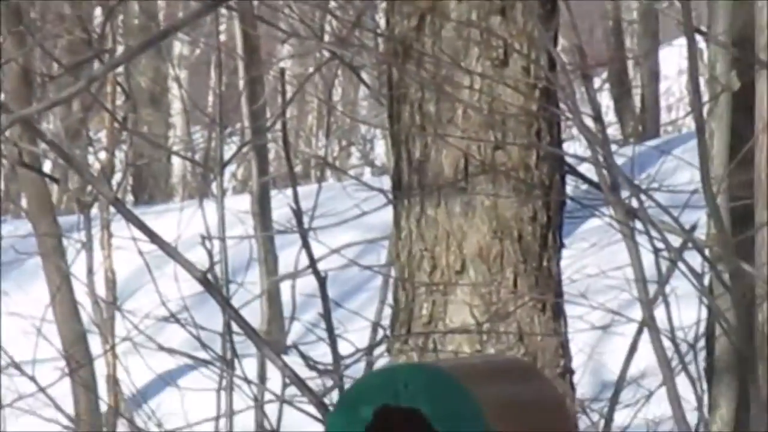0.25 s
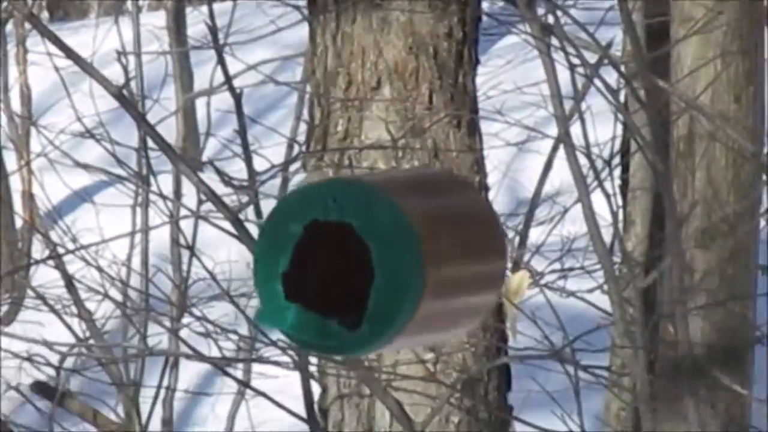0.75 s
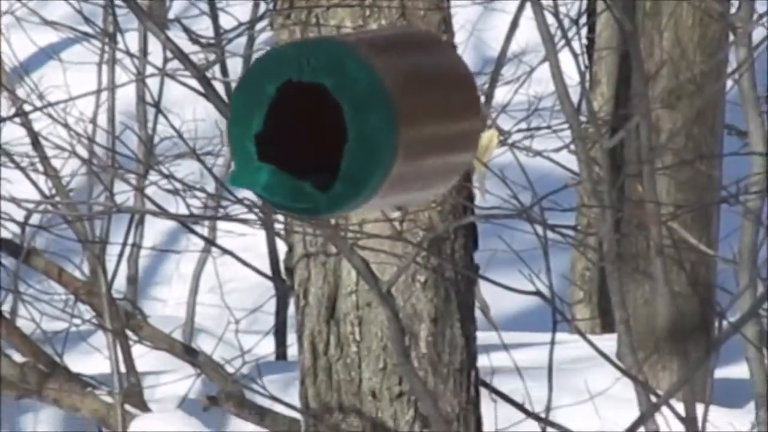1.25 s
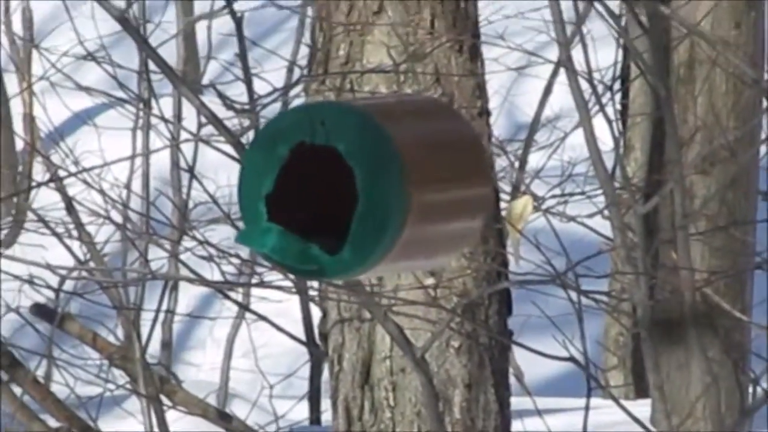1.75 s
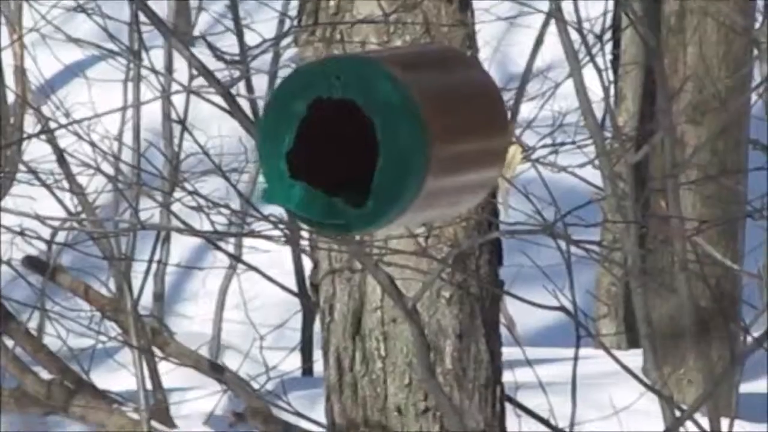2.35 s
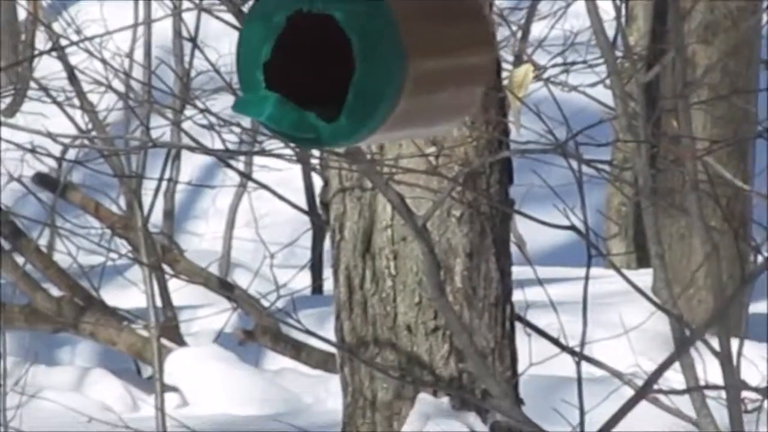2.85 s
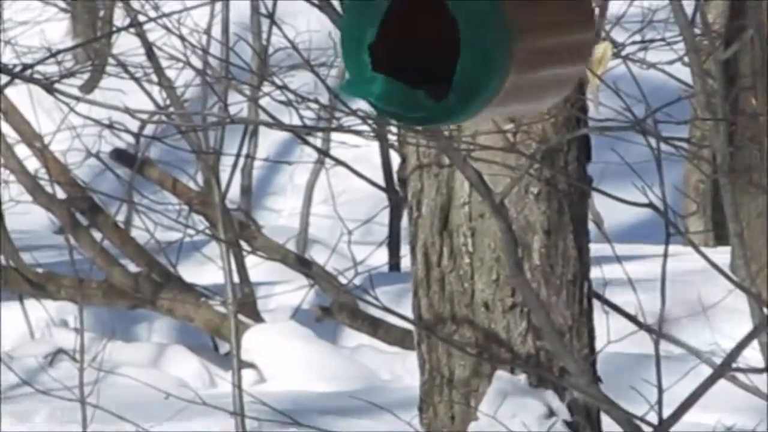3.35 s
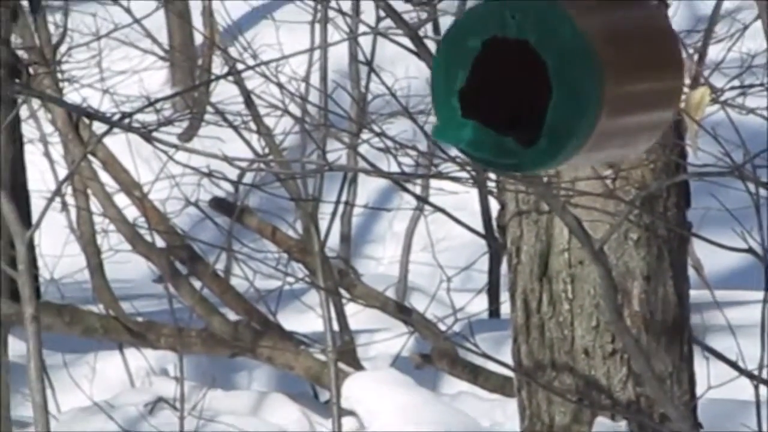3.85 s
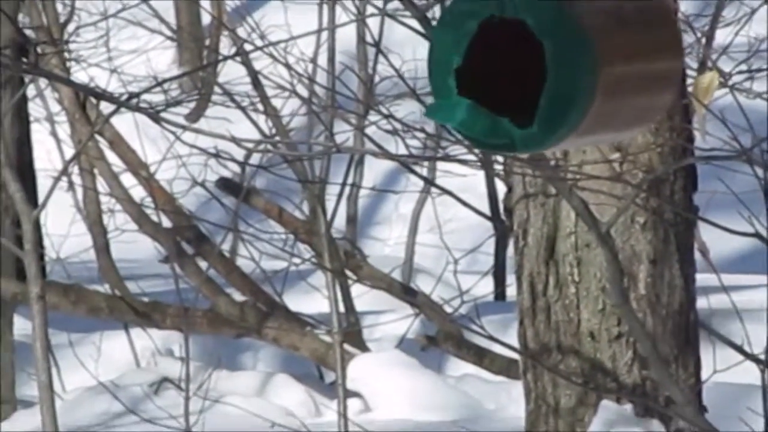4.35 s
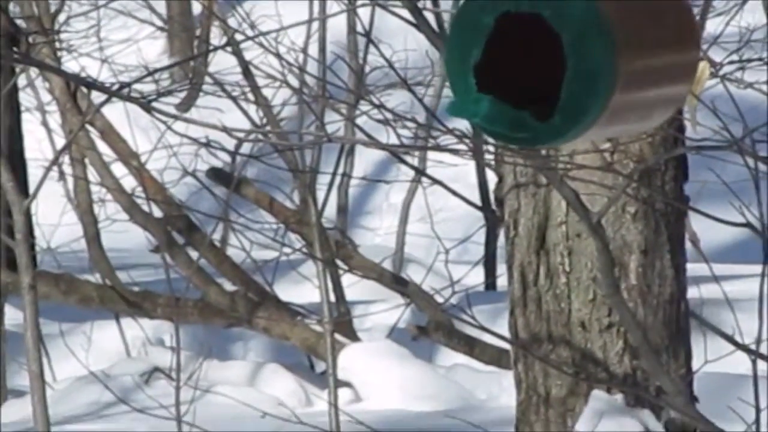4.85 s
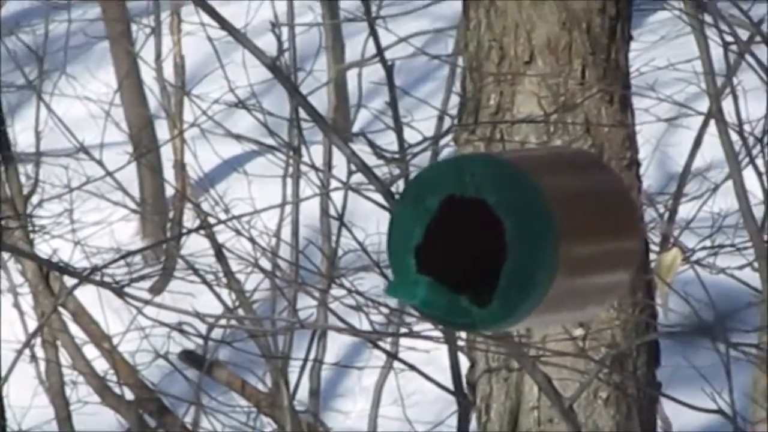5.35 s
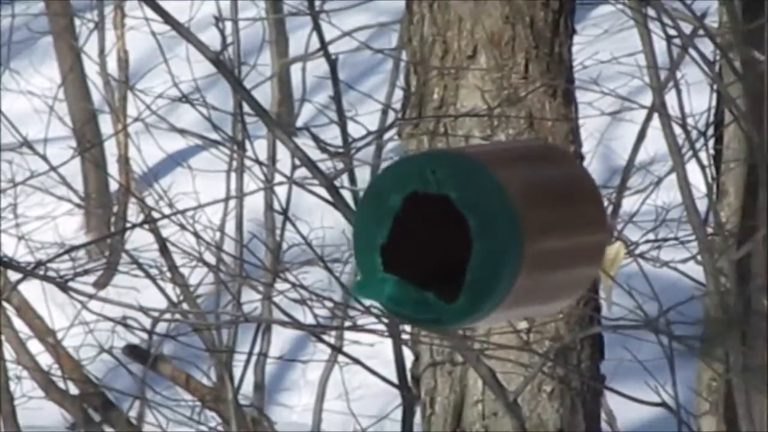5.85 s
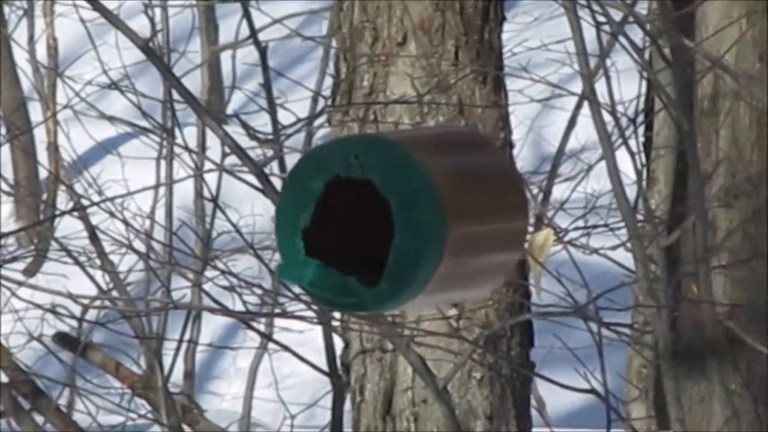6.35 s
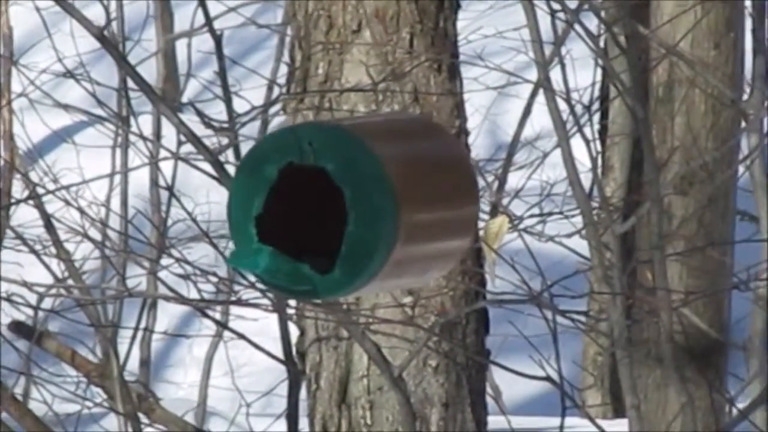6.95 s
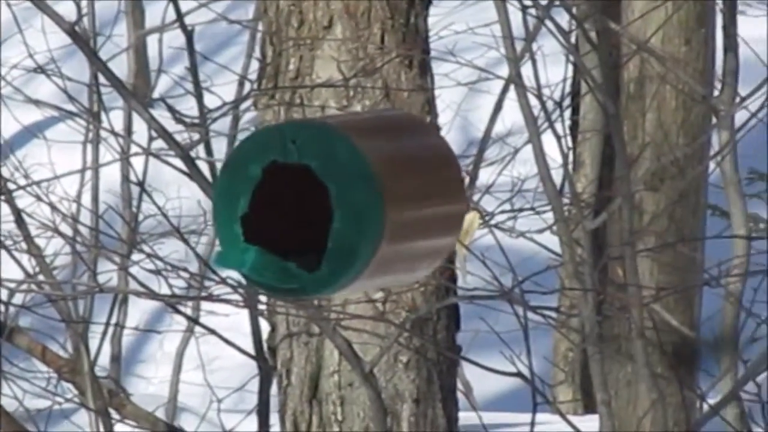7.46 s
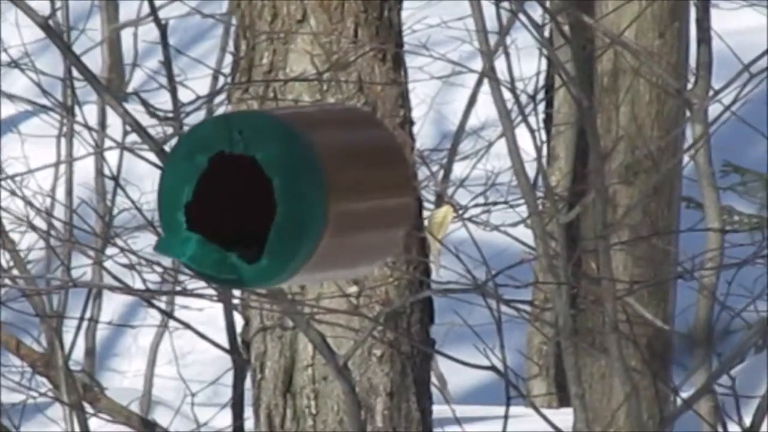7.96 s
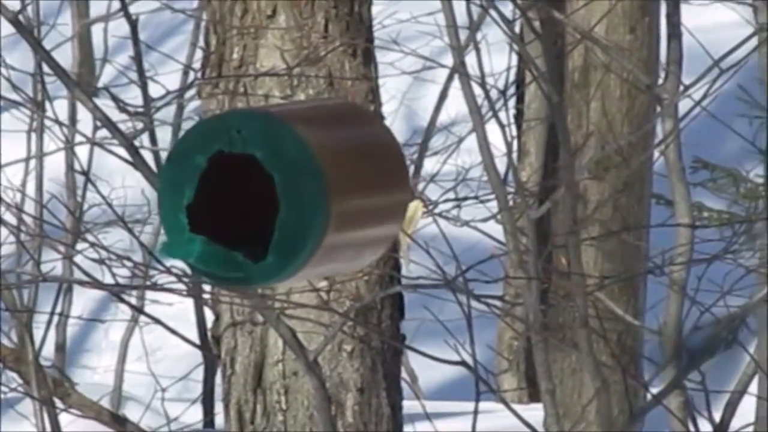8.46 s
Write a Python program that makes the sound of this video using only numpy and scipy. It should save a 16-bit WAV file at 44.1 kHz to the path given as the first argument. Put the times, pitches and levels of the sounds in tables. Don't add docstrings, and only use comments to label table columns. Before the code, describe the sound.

A chickadee is already buzzing at 0 s: five hoarse, noisy dees, each about a quarter second, run until 1.25 s, the last one quieter. A faint far buzz follows at 1.4, tiny dry ticks at 1.6-2.7, a weak high peep at 2.1 and a lone rough dee at 2.2. At 2.95 one very thin, piercing chip rises briefly and falls. Four more rasping dees from 3.1 to 4.0 grow louder and tighter. Then mostly background, with faint whistles at 4.2-5.3, including a steep chip near 5.0. From 5.74 a clearer, lower-buzzing, louder bird gives seven nasal dees about 0.3 s apart, then another at 8.0; a distant buzz answers at 8.35. Trunks return short echoes. Low handling thumps cluster near 0.7, 3.3 and 3.8 s; soft hollow taps recur from 4.6. Wind rumble, distant traffic and steady hiss continue throughout, gusting at the end.

```python
import sys
import numpy as np
from scipy import signal
from scipy.fft import rfft, irfft
from scipy.io import wavfile
from scipy.ndimage import uniform_filter1d, minimum_filter1d

SR = 44100
rng = np.random.default_rng(int(sys.argv[2]) if len(sys.argv) > 2 else 0)


def decibels_to_gain(level_db):
    exponent = np.asarray(level_db, float) / 20
    return 10 ** exponent


def wrap_up_sound(samples):
    columns = np.atleast_2d(samples).T
    tamed = np.clip(columns, -1, 1)
    steps = np.round(tamed * 32767).astype(np.int16)
    wavfile.write(sys.argv[1], SR, steps)


N = 383669


def colour(table, hz):
    f, db = np.transpose(table)
    return decibels_to_gain(np.interp(np.log(np.maximum(hz, 1)), np.log(f), db))


def over_time(table):
    return np.interp(np.arange(N) / SR, *np.transpose(table))


def slow(shape, hz):
    k = max(int(SR / hz), 1)
    noise = rng.standard_normal(shape)
    return uniform_filter1d(uniform_filter1d(noise, k), k) * np.sqrt(1.5 * k)


def add(out, at, x):
    x, at = x[max(-at, 0):], max(at, 0)
    out[at:at + len(x)] += x[:N - at]


def ring(hz, t60):
    t = np.arange(int(t60 * SR)) / SR
    return np.sin(2 * np.pi * hz * t) * decibels_to_gain(-60 * t / t60)


def air():
    # (frequency [Hz], level per Hz [dB])
    air_colour = [(12, -38), (20, -8.5), (43, -3.5), (105, -8), (160, -2.5), (194, -6.5), (217, -3),
                  (294, -7), (328, -7), (357, -6), (994, -13), (1550, -24), (4820, -35.5), (11400, -41.5),
                  (12500, -44.5), (15000, -47)]
    # (time [s], gust level [dB])
    gusts = [(0.0, -61.5), (0.63, -58), (0.94, -64), (1.77, -66), (3.25, -66.5), (3.4, -59), (5.47, -67.5),
             (7.15, -60), (8.4, -63), (8.7, -53)]
    # (time [s], level [dB])
    traffic_db = [(0, 2.5), (.5, 0), (1.8, 0), (2.35, 2), (3.0, -1), (7.0, 0), (7.4, 1.5), (8.7, 2)]
    hz = np.fft.rfftfreq(N, 1 / SR)
    gain = colour(air_colour, hz) / (1 + (hz / 15200) ** 60)
    mid, side = (rfft(rng.standard_normal(N)) * gain for _ in range(2))
    bass = 1 / (1 + (hz / 140) ** 4)
    treble = 1 / (1 + (1400 / np.maximum(hz, 1)) ** 4)
    rumble = irfft(mid * bass, N) * decibels_to_gain(over_time(gusts) + 63.5 + 3 * slow(N, 9))
    traffic = irfft(mid * (1 - bass - treble), N) * decibels_to_gain(over_time(traffic_db) + 1.3 * slow(N, 8.4))
    hiss = irfft(mid * treble, N)
    x = rumble + traffic + hiss
    spread = irfft(side * np.clip(hz / 9000, .08, .6), N)
    whine = decibels_to_gain(-89) * np.sin(2 * np.pi * 11795 * np.arange(N) / SR)
    return (x + spread * np.array([[1], [-1]])) * decibels_to_gain(-47.5) / np.std(x) + whine


def handling():
    # (peak time [s], peak level [dB], swing [Hz])
    thumps = [(0.421, -35, 92), (0.612, -42, 99), (0.65, -25, 75), (0.71, -30.5, 92), (0.727, -33, 84),
              (0.75, -30, 53), (0.769, -30.5, 102), (1.543, -33.5, 104), (3.268, -30, 89), (3.293, -30, 71),
              (3.317, -27.5, 83), (3.338, -33, 67), (3.454, -36, 87.5), (3.489, -34, 53),
              (3.747, -23.5, 102.5), (3.846, -27.5, 81), (4.117, -36, 73.5), (4.422, -34, 74),
              (5.378, -35, 117.5), (6.551, -37, 130), (6.568, -35, 140), (6.932, -40, 141),
              (6.968, -33, 115), (7.95, -36, 72), (8.144, -34, 101), (8.191, -33.5, 88)]
    # (time [s], peak level [dB], upper ring relative level [dB])
    taps = [(4.624, -52.5, 5.5), (5.04, -45, -11), (5.209, -47.5, -3.5), (5.339, -46, -17),
            (5.505, -48, -19.5), (5.649, -52, -13), (5.778, -47, -15), (5.919, -45.5, -21),
            (6.078, -46, -25), (6.222, -46.5, -5), (6.358, -50, -18.5), (6.524, -43.5, -16),
            (6.659, -45, -15), (6.916, -42, -16.5), (7.125, -64, -9), (7.266, -57, -9.5),
            (7.453, -49.5, 0.5), (7.544, -50, -14), (7.761, -43.5, -18), (7.889, -48, 0.5), (8.05, -43, -4),
            (8.179, -47, -18), (8.311, -45.5, -20), (8.458, -54, -4), (8.632, -49, -13)]
    # (frequency [Hz], t60 [s])
    shell = [
        (162, 0.27),
        (340, 0.28),
    ]
    out = np.zeros(N)
    for s, db, hz in thumps:
        cycles = np.arange(-1500, 1500) / SR * hz
        swing = np.cos(2 * np.pi * cycles) * np.exp(-(cycles / 0.46) ** 2)
        add(out, int(s * SR) - len(cycles) // 2, decibels_to_gain(db) * swing)
    for s, db, upper_db in taps:
        for (hz, t60), gain_db in zip(shell, (db, db + upper_db)):
            add(out, int(s * SR), decibels_to_gain(gain_db + 5.5) * ring(hz, t60))
    return out


def woods(x, echo_db, blur_db, t60, alike):
    # (delay [s], level [dB], left minus right [dB])
    trunks = [
        (0.0163, -9.5, 0.7),
        (0.034, -11, 1),
        (0.048, -14.5, 2),
    ]
    t = np.arange(int(.6 * SR)) / SR
    same, *own = rng.standard_normal((3, len(t)))
    swell = (1 - np.exp(-t / 0.0067)) * decibels_to_gain(-60 * t / t60)
    swell = swell / np.sqrt(np.sum(swell ** 2))
    answer = decibels_to_gain(blur_db) * swell * (np.sqrt(alike) * same + np.sqrt(1 - alike) * np.array(own))
    answer[:, 0] = 1
    for s, db, pan_db in trunks:
        answer[:, int(s * SR)] += decibels_to_gain(db + echo_db + np.array([pan_db, -pan_db]) / 2)
    return signal.fftconvolve(x[None], answer)[:, :N]


def ticks():
    # (time [s], peak level [dB], ring [Hz])
    twigs = [
        (1.5874, -51.5, 5310),
        (1.7075, -48.5, 6750),
        (2.4694, -50, 5500),
        (2.5706, -45, 4460),
        (2.7135, -48, 6630),
        (4.7003, -55.5, 6950),
        (8.6891, -49, 3985),
    ]
    out = np.zeros(N)
    for s, db, hz in twigs:
        tone = ring(hz, t60=0.0061)
        click = .5 * np.abs(tone) * rng.standard_normal(len(tone))
        add(out, int(s * SR), decibels_to_gain(db + 3.0) * (tone + click))
    return out


def read(note):
    s, *columns = np.transpose(note)
    t = np.arange(int(s[0] * SR), int(s[-1] * SR)) / SR
    edge = np.clip(np.minimum((t - s[0]) / 0.014, (s[-1] - t) / 0.0059), 0, 1)
    return int(s[0] * SR), edge, [np.interp(t, s, c) for c in columns]


def whistles(notes):
    out = np.zeros(N)
    for note in notes:
        at, edge, (hz, db) = read(note)
        hz = uniform_filter1d(hz, size=200)
        add(out, at, edge * decibels_to_gain(db) * np.sqrt(2) * np.sin(2 * np.pi * np.cumsum(hz) / SR))
    return out


def dees(notes, throat, beak_rest_hz, pipe_rest_hz, wobble, smear_hz, patchy_db, follow, locked):
    out = np.zeros(N)
    for note in notes:
        at, edge, (rate_hz, db, beak_hz, low_db, rough, pipe_hz) = read(note)
        rate_hz = uniform_filter1d(rate_hz, size=1500)
        pipe_hz = pipe_hz * (rate_hz / rate_hz.max()) ** follow
        anchor_hz = 9 * rate_hz if locked else pipe_hz
        k = np.arange(-6, int(11000 / rate_hz.max()))[:, None]
        hz = np.maximum(anchor_hz + k * rate_hz, 300)
        phase = 2 * np.pi * np.cumsum(hz * (1 + wobble * slow(len(db), 90)), axis=1) / SR

        upper = np.clip((hz - 4400) / 600 + .5, 0, 1)
        lower = 1 - upper
        beak_share = upper * np.clip((9500 - hz) / 2000, 0, 1)
        shift = (beak_rest_hz / beak_hz) ** beak_share * (pipe_rest_hz / pipe_hz) ** lower
        gain = colour(throat, hz * shift) * decibels_to_gain(patchy_db * slow(hz.shape, 25))
        gain = gain / (1 + (hz / 11300) ** 24)
        upper_rms, lower_rms = (np.sqrt(np.sum((gain * share) ** 2, axis=0) / 2) for share in (upper, lower))
        gain = gain * (upper / upper_rms + lower * decibels_to_gain(low_db) / lower_rms)

        r = np.clip(rough * (hz / 6000) ** .3, 0, 1)
        smear = (slow(hz.shape, smear_hz) + 1j * slow(hz.shape, smear_hz)) / np.sqrt(2)
        spin = np.exp(1j * (phase + 0.77 * rng.standard_normal(k.shape)))
        partials = gain * (spin * (np.sqrt(1 - r) + np.sqrt(r) * smear)).real
        add(out, at, edge * decibels_to_gain(db) * np.sum(partials, axis=0))
    return out


def sing(rows, rough, low_db, pipe_hz, attack_s, release_s, crest, start_db, swell_db, sag_db, end_db, slack, bend,
         beak_hz_per_s=0, pipe_hz_per_s=0, neck=0, clearing=0):
    notes = []
    for s, length, db, rate_hz, beak_hz in rows:
        bends = np.array([0, attack_s, crest * length, length - release_s, length])
        t = np.union1d(bends, np.linspace(0, length, num=7))
        level_db = db + np.interp(t, bends, [start_db, -swell_db, 0, -sag_db, end_db])
        rate = rate_hz * (1 - slack * (1 - t / length) ** bend)
        beak = beak_hz + beak_hz_per_s * t
        pipe = pipe_hz + pipe_hz_per_s * t + neck * (beak_hz - rows[0][-1])
        roughness = rough * (1 - clearing * np.clip(4 * t / length - 1.6, 0, 1))
        notes.append(np.transpose([s + t, rate, level_db, beak, low_db + 0 * t, roughness, pipe]))
    return notes


def peeps():
    # (start [s], length [s], first pitch [Hz], last pitch [Hz], level [dB])
    far_peeps = [
        (2.123, 0.086, 7076, 7035, -62),
        (4.19, 0.087, 6450, 6560, -72),
        (4.365, 0.072, 5080, 4880, -67.5),
        (4.983, 0.026, 9020, 6670, -46.5),
        (5.119, 0.06, 8350, 6900, -52),
        (5.191, 0.07125, 2800, 2640, -67),
    ]
    notes = []
    for s, length, hz0, hz1, db in far_peeps:
        middle = (s + length / 2, (hz0 + hz1) / 2, db)
        notes.append([(s, hz0, db - 1), middle, (s + length, hz1, db - 1)])
    return whistles(notes)


def far_birds():
    # (frequency [Hz], level [dB])
    first_throat = [(1470, -51.5), (2500, -24), (2960, -15), (3570, -12.5), (4730, -10), (4940, -4),
                    (5860, -2), (8000, -39.5), (10400, -61), (17600, -120)]
    second_throat = [(1470, -48), (2500, -8.5), (2790, -21), (4370, 2.5), (5590, -21), (6650, -3),
                     (7410, -44), (9420, -18), (10500, -48.5), (13600, -70), (22000, -120)]
    # (start [s], length [s], crest level [dB], final buzz rate [Hz], starting beak resonance [Hz])
    first_note = [(1.405, 0.13, -54.5, 433, 5600)]
    second_note = [(8.343, .097, -46.5, 444, 5000)]
    shape = dict(rough=0.915, low_db=-7, pipe_hz=2980, release_s=0.048, crest=0.2, swell_db=-3.5, sag_db=15,
                 end_db=-17, slack=.045, bend=2.9)
    first = sing(first_note, attack_s=0.024, start_db=-13, **shape)
    second = sing(second_note, attack_s=0.00493, start_db=3.0, **shape)
    return (dees(first, first_throat, beak_rest_hz=5600, pipe_rest_hz=3018.5, wobble=0.0065, smear_hz=496.07,
                 patchy_db=2.5, follow=0, locked=True)
            + dees(second, second_throat, beak_rest_hz=5000, pipe_rest_hz=3000, wobble=0.0086, smear_hz=508.64,
                   patchy_db=1.5, follow=0, locked=True)
            + peeps())


def chip():
    # (time [s], pitch [Hz], level [dB])
    glide = [
        (2.952, 8910, -31.5),
        (2.957, 8290, -24.5),
        (2.968, 8500, -16),
        (2.98, 8610, -16.5),
        (2.99, 8779, -13.5),
        (3.008, 8680, -13),
        (3.024, 8355, -13),
        (3.037, 7879, -18.5),
        (3.044, 5900, -30),
    ]
    return whistles([glide])


def hoarse_bird():
    # (frequency [Hz], level [dB])
    early_throat = [(740, -68), (1250, -41), (1780, -15.5), (1930, -24.5), (2120, -24), (2350, -24),
                    (2750, -5), (3880, -18), (4340, -14.5), (4850, -14), (6060, 0), (6970, -1), (9460, -19),
                    (10700, -41), (11500, -59.5), (15000, -88.5), (22000, -120)]
    later_throat = [(740, -65.5), (1250, -38.5), (1590, -19), (2140, -24), (2630, -10), (2860, -15),
                    (3080, -14), (3340, -14.5), (4800, -17.5), (5520, -5.5), (6410, 1.5), (7100, -3.5),
                    (8080, -15.5), (9380, -12), (11500, -74), (15000, -87.5), (22000, -120)]
    lone_throat = [(740, -69), (1250, -36), (1770, -11.5), (1990, -29.5), (2180, -11), (3440, -10.5),
                   (4240, -17.5), (5850, -0.5), (6610, -14.5), (9840, -37.5), (10800, -52.5), (12000, -100),
                   (15600, -130), (22000, -120)]
    # (start [s], length [s], crest level [dB], final buzz rate [Hz], starting beak resonance [Hz])
    early_notes = [
        (-.15, .225, -19.5, 435, 6283),
        (.075, 0.22, -19.5, 453.6, 6244),
        (.318, 0.21, -17, 479, 6355),
        (.558, .342, -19.5, 458.4, 6500),
        (.985, .27, -23, 454, 6686),
    ]
    later_notes = [
        (3.088, .217, -24.5, 391.5, 6402),
        (3.315, 0.22, -22, 406.7, 6357),
        (3.535, .245, -19.5, 440, 6290),
        (3.782, 0.21, -17.5, 468, 6736),
    ]
    lone_note = [(2.175, .195, -23, 456.6, 5600)]
    shape = dict(rough=1.0, attack_s=.035, release_s=.037, crest=0.79, swell_db=1.5, sag_db=0.6, bend=.7)
    early = sing(early_notes, low_db=-10.5, pipe_hz=2600, slack=.07, beak_hz_per_s=980, pipe_hz_per_s=600,
                 neck=.45, start_db=-6, end_db=-11, **shape)
    later = sing(later_notes, low_db=-13.5, pipe_hz=2401, slack=.05, beak_hz_per_s=500, pipe_hz_per_s=1300,
                 neck=.3, start_db=-5.5, end_db=-6.5, **shape)
    lone = sing(lone_note, rough=1.0, clearing=.7, low_db=-9, pipe_hz=3010, attack_s=0.033, release_s=.03,
                crest=0.35, start_db=-6, swell_db=2.5, sag_db=3.0, end_db=-2, slack=.08, bend=1.2,
                beak_hz_per_s=810)
    return (dees(early, early_throat, beak_rest_hz=6500, pipe_rest_hz=2800, wobble=.006, smear_hz=320,
                 patchy_db=3.0, follow=0, locked=False)
            + dees(later, later_throat, beak_rest_hz=6450, pipe_rest_hz=2590, wobble=0.0069, smear_hz=332,
                   patchy_db=2.5, follow=0, locked=False)
            + dees(lone, lone_throat, beak_rest_hz=5700, pipe_rest_hz=2884.1, wobble=0.0065, smear_hz=400,
                   patchy_db=0.5, follow=0, locked=True))


def clear_bird():
    # (frequency [Hz], level [dB])
    run_throat = [(740, -71.5), (1250, -62), (1580, -29.5), (2000, -39.5), (2130, -63), (2640, -23),
                  (3150, -13.5), (3670, -14.5), (4240, -26), (5100, -11), (5760, 3.5), (6500, -8.5),
                  (7070, -16.5), (8160, -35), (9620, -33), (11700, -45.5), (14500, -63)]
    lone_throat = [(740, -75), (1250, -51), (1500, -27), (1900, -31), (2290, -51.5), (2990, -15.5),
                   (4240, -15.5), (4500, -7), (6000, 2.5), (7220, -30), (10100, -39.5), (12700, -38),
                   (14500, -63)]
    # (start [s], length [s], crest level [dB], final buzz rate [Hz], starting beak resonance [Hz])
    run_notes = [
        (5.74, .19, -12, 315, 5600),
        (6.02, 0.2, -12, 315.3, 5660),
        (6.31, .2, -12, 320.2, 5746),
        (6.648, 0.2, -11, 328.4, 5713),
        (6.93, .19, -11, 329, 5932),
        (7.245, 0.19, -10.5, 332, 5860),
        (7.565, 0.2, -11.5, 331.6, 5853),
    ]
    lone_note = [(7.995, .175, -12.5, 319, 6050)]
    shape = dict(attack_s=0.023, release_s=0.033, crest=0.66, start_db=-11, swell_db=4.5, sag_db=5.0, end_db=-10,
                 slack=.12, bend=2.2)
    run = sing(run_notes, rough=0.47, low_db=-14, pipe_hz=2996, beak_hz_per_s=700, pipe_hz_per_s=230, neck=0.25,
               **shape)
    lone = sing(lone_note, rough=.33, low_db=-12.0, pipe_hz=3020, beak_hz_per_s=-600, **shape)
    return (dees(run, run_throat, beak_rest_hz=5838, pipe_rest_hz=3040, wobble=0.0036, smear_hz=270,
                 patchy_db=3.5, follow=0.96, locked=True)
            + dees(lone, lone_throat, beak_rest_hz=5876, pipe_rest_hz=2980, wobble=0.0028, smear_hz=255,
                   patchy_db=3.0, follow=1.0, locked=True))


def scene():
    # (time [s], left minus right [dB])
    side_of = [
        (0.0, -0.5),
        (0.77, -1.0),
        (1.19, -4),
        (3.05, -4),
        (3.41, -0.5),
        (4.04, -2.5),
        (5.33, 0.5),
        (5.38, -2.5),
        (8.7, -2),
    ]
    far = woods(far_birds(), echo_db=4.0, blur_db=8.0, t60=0.244, alike=0.41)
    near = woods(ticks() + chip() + hoarse_bird() + clear_bird(), echo_db=-1.2, blur_db=-4.5, t60=0.17, alike=0.77)
    pan_db = over_time(side_of)
    birds = (decibels_to_gain(-1.0) * near + decibels_to_gain(-3.5) * far) * decibels_to_gain(np.array([pan_db, -pan_db]) / 2)
    return birds + handling() + air()


def band_limit(x):
    return signal.sosfilt(signal.butter(12, 15050, fs=SR, output="sos"), x)


def record(dry):
    # (frequency [Hz], level [dB])
    width = [(300, -5.5), (3800, -18), (4800, -12), (5800, 1), (9000, -5.5), (12000, -1)]
    hz = np.fft.rfftfreq(N, 1 / SR)
    mid, side = (dry[0] + dry[1]) / 2, (dry[0] - dry[1]) / 2
    side = irfft(rfft(side) * colour(width, hz), N)
    both = np.array([mid + side, mid - side])

    top = irfft(rfft(both) / (1 + (11000 / np.maximum(hz, 1)) ** 60), N)
    loudness = np.sqrt(uniform_filter1d(np.diff(mid, prepend=0) ** 2, size=1000) + 1e-12)
    both = both - top / (1 + (decibels_to_gain(-46) / loudness) ** 6)

    peak = np.abs(both).max(axis=0) + 1e-9
    room_left = minimum_filter1d(np.minimum(.92 / peak, 1), size=200)
    both = both * uniform_filter1d(room_left, size=200)
    return band_limit(both - 0.067 * both ** 3)


dry = scene()
out = record(dry)
wrap_up_sound(out)
```